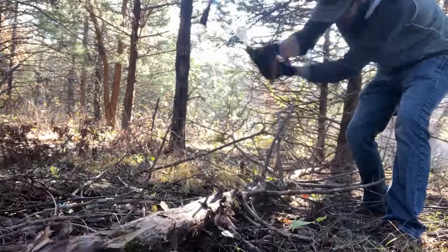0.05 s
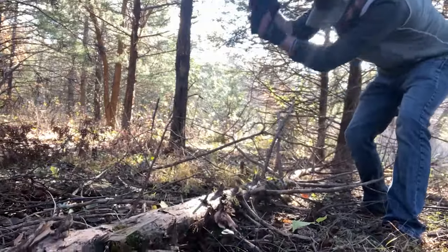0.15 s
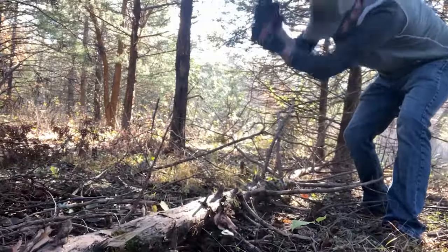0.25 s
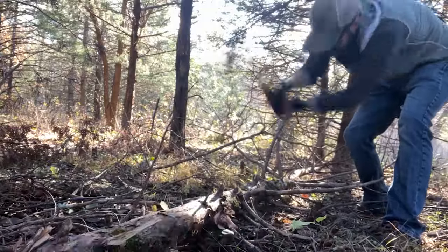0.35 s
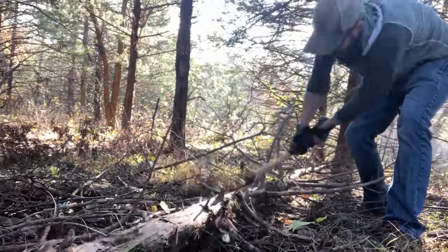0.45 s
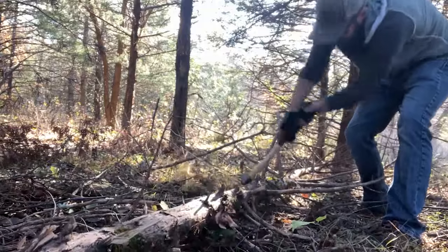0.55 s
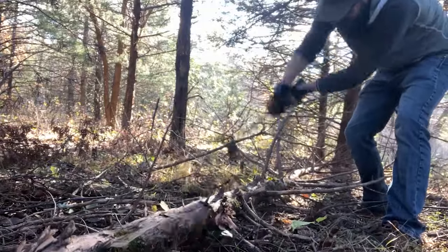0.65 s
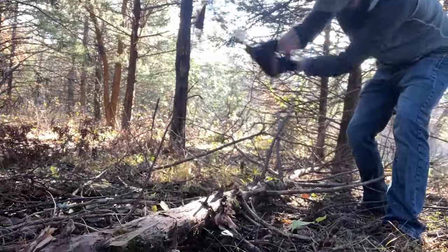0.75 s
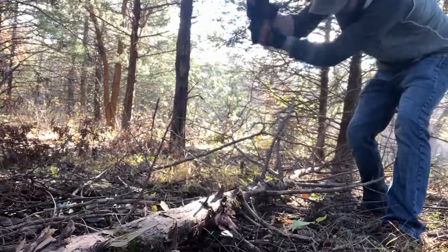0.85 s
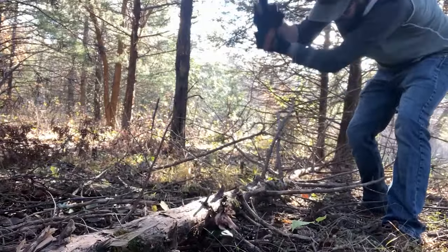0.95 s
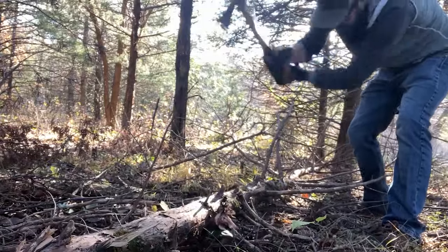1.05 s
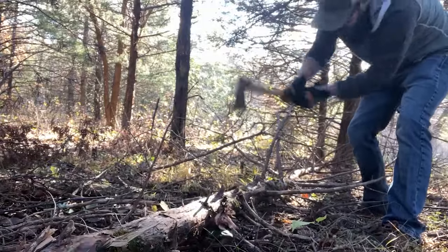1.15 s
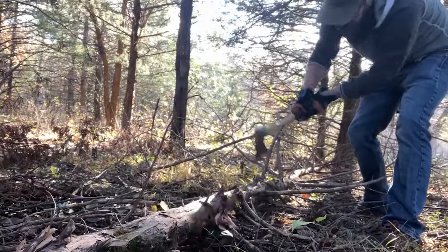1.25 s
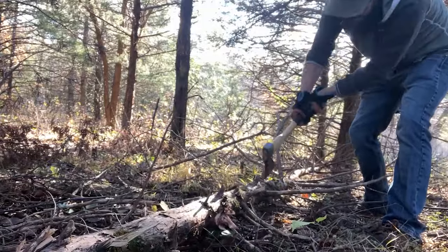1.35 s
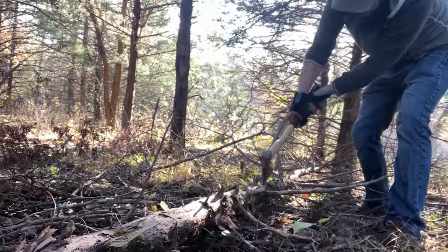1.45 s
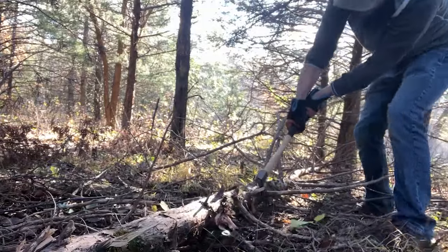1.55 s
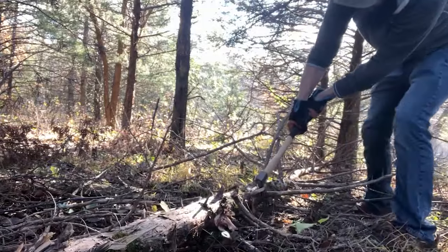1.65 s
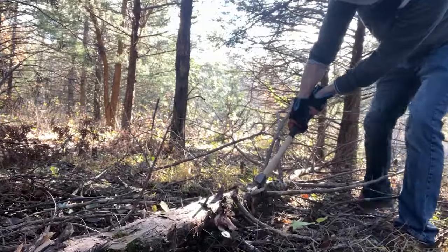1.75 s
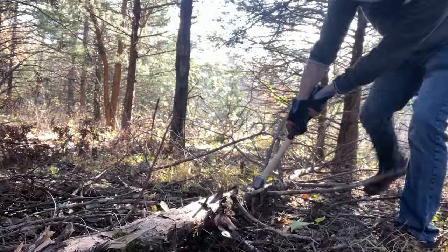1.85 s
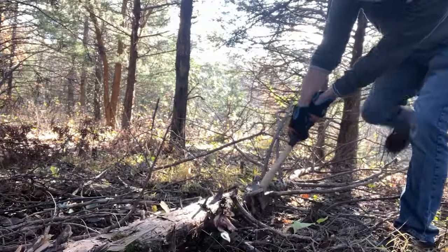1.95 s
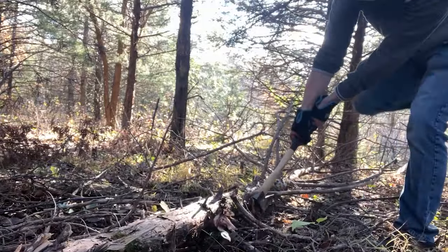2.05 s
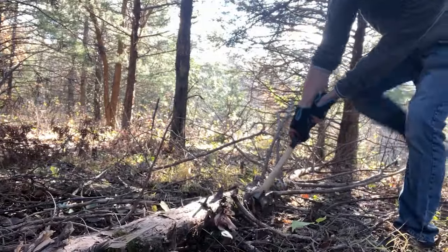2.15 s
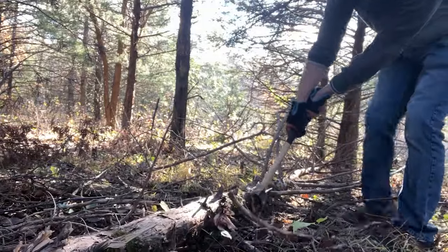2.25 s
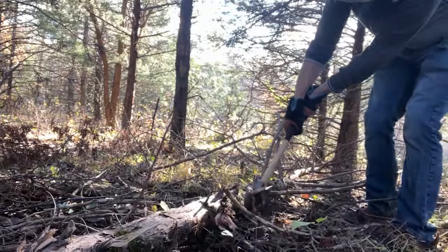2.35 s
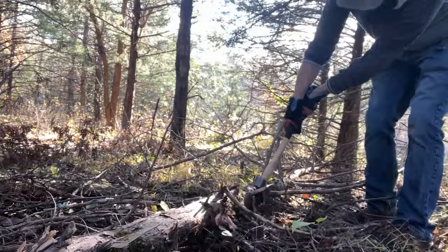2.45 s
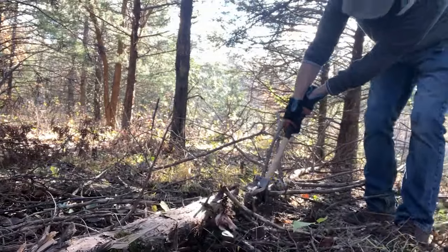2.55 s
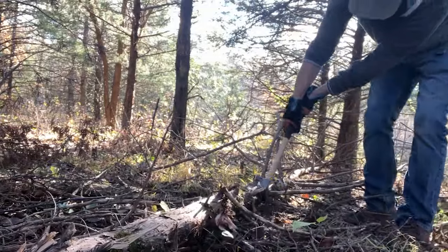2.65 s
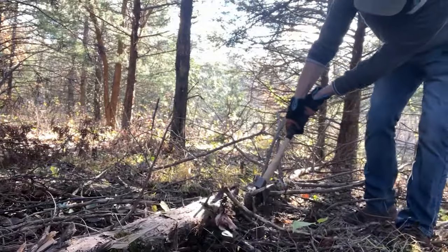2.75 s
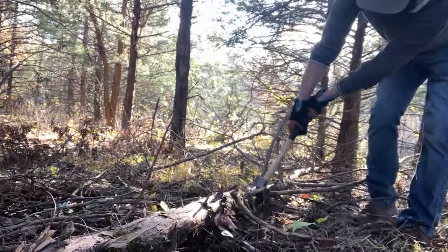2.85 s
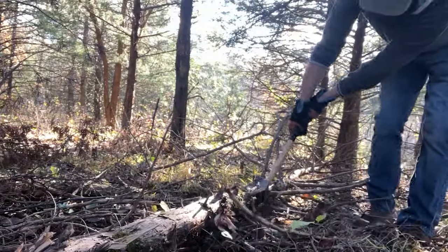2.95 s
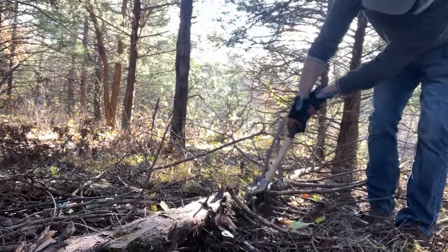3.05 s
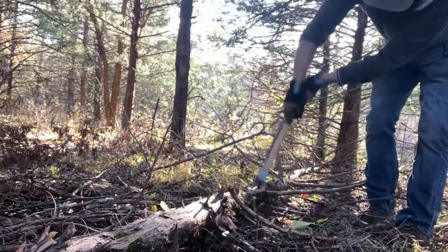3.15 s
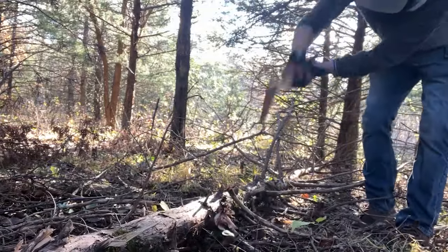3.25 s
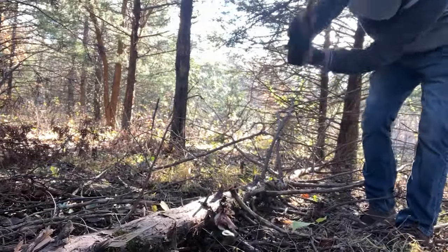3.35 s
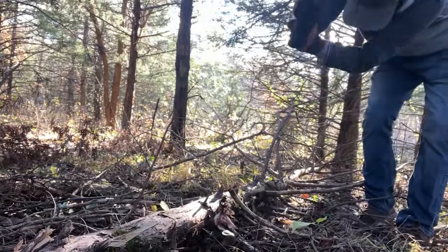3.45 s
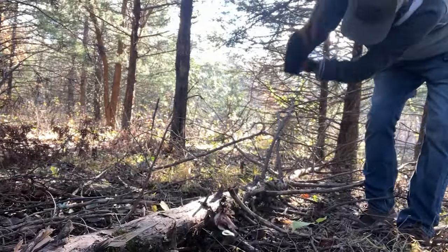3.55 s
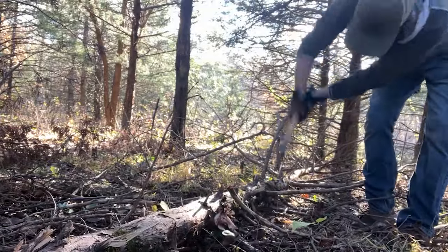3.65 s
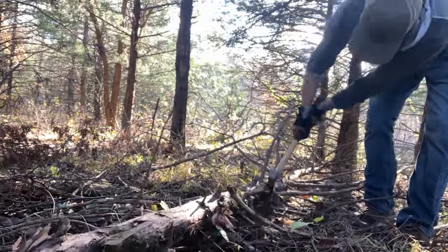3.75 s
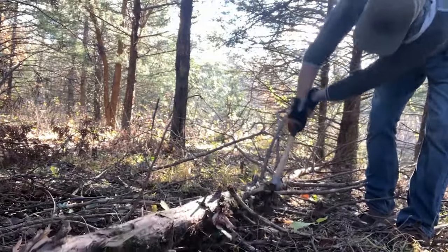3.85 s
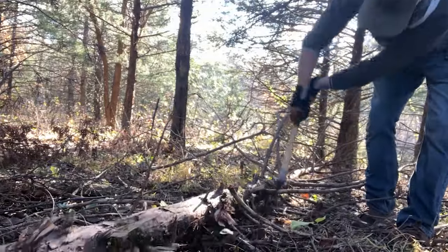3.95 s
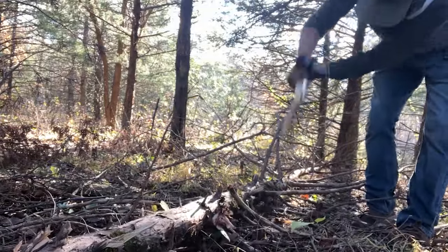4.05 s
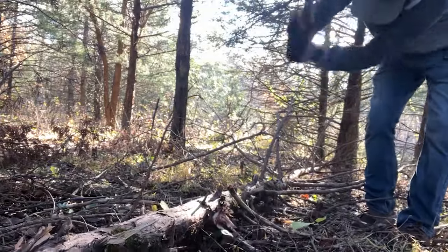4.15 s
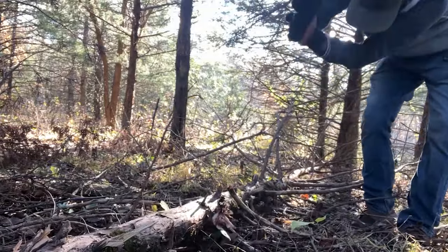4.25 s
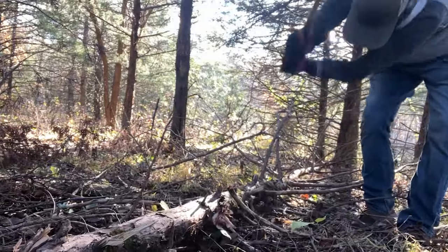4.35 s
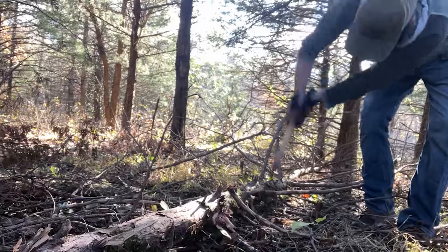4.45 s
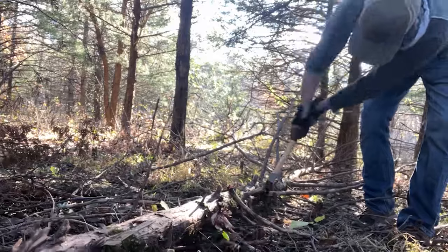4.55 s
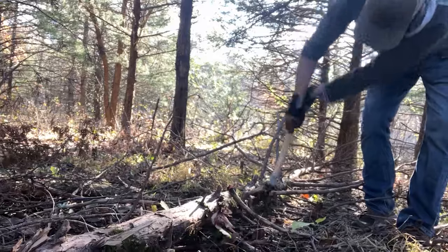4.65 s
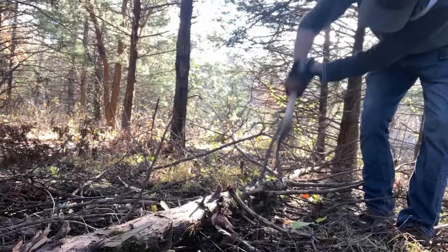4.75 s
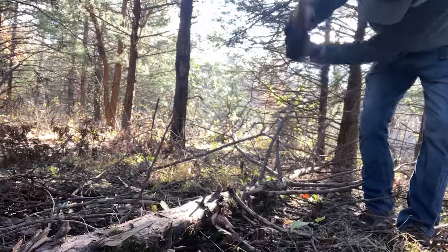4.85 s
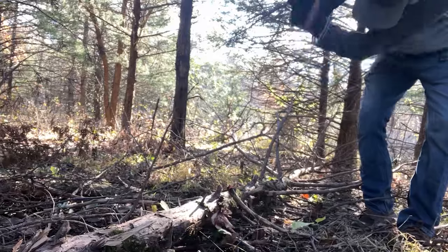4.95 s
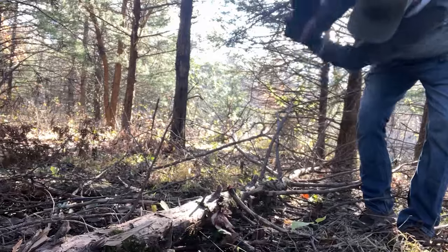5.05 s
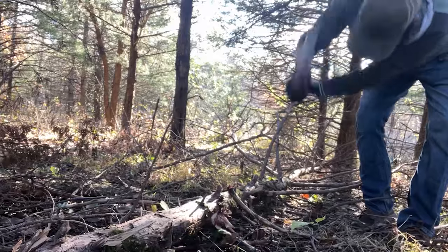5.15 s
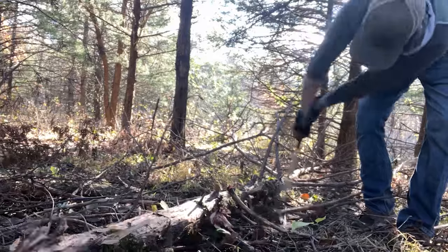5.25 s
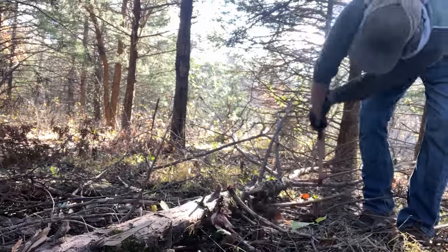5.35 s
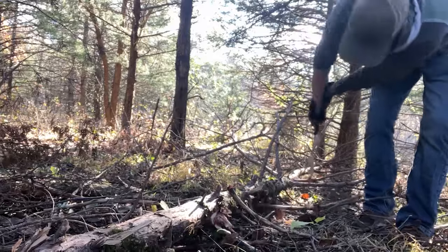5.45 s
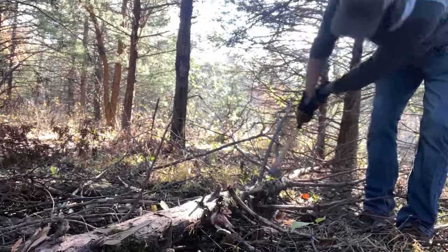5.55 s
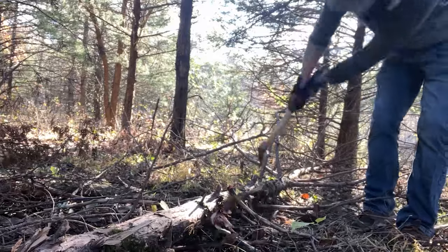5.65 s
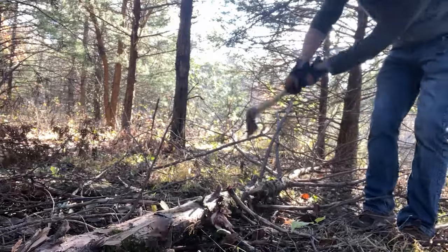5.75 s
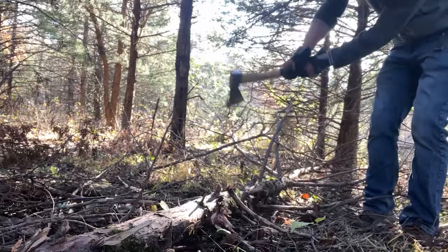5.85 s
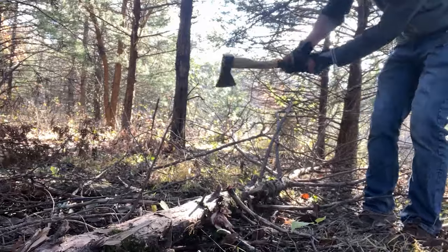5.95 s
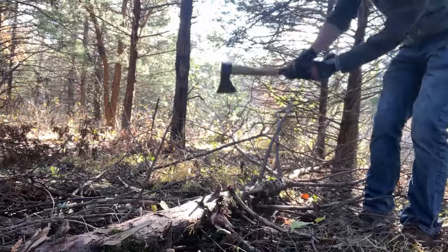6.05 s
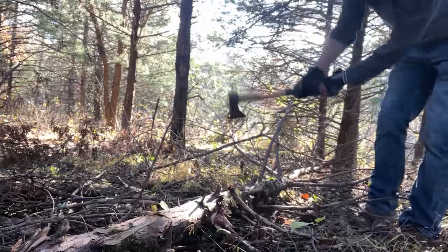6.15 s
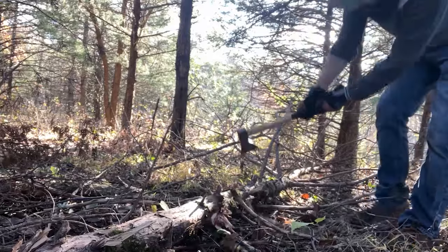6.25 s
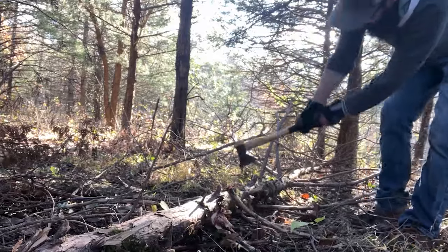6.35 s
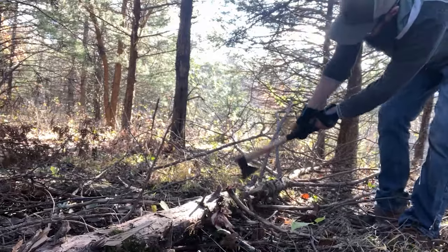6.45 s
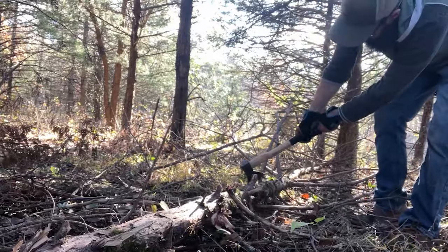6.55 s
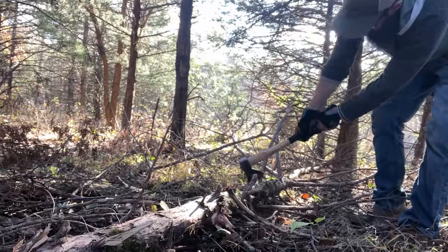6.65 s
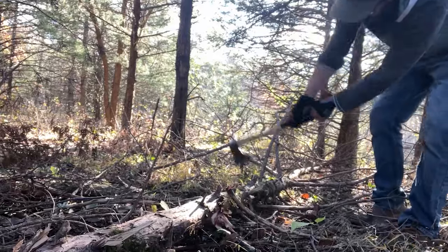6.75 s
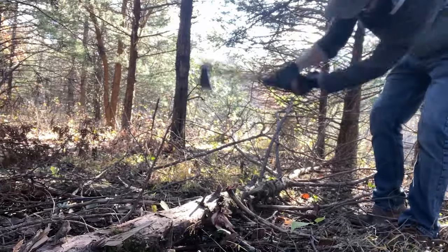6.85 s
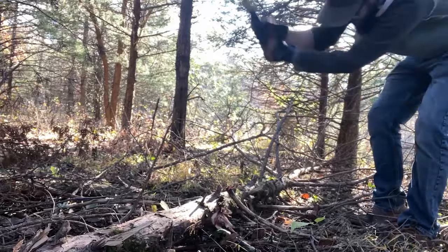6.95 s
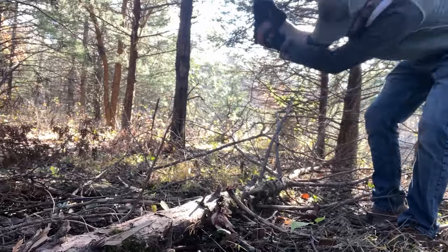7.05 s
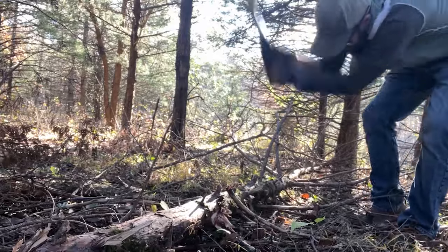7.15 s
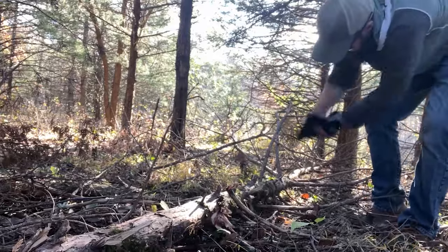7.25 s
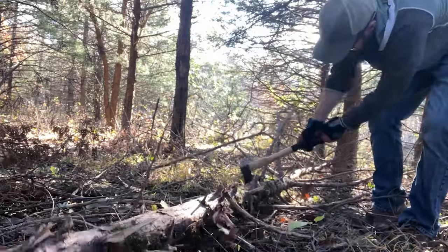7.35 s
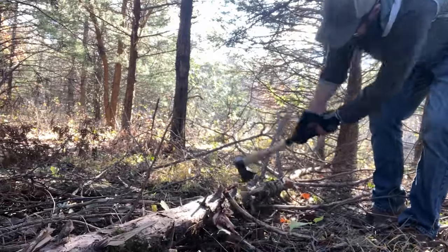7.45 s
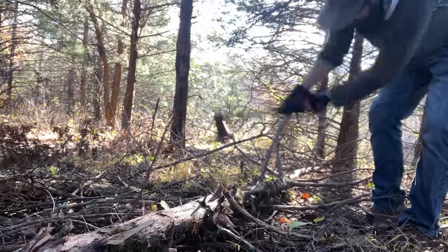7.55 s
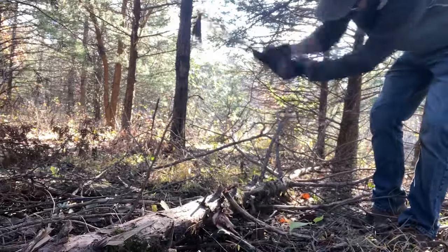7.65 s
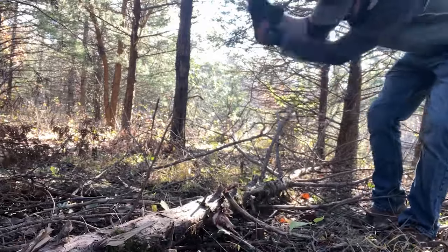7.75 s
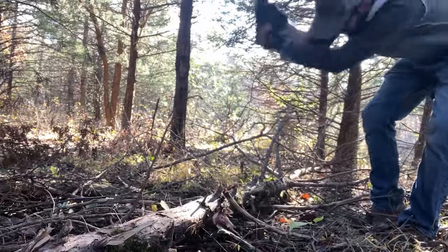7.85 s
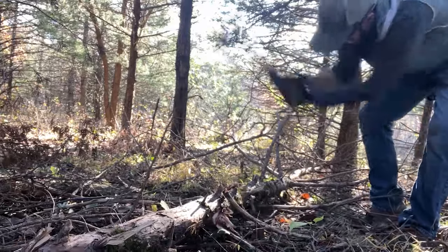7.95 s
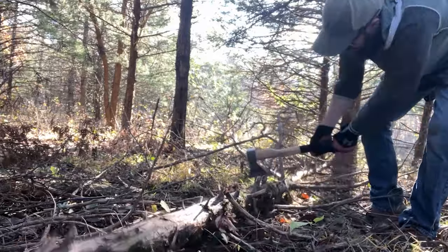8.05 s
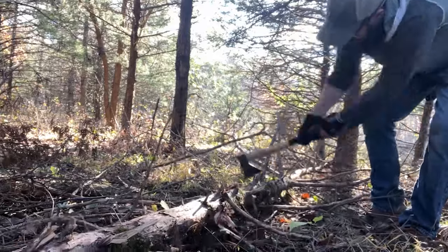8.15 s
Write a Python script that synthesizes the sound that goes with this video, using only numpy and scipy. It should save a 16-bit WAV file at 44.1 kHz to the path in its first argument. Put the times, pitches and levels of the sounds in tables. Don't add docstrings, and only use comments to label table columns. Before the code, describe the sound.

In a dry wood, heard in stereo from a few metres, light litter rustle and a quiet, far-off low rumble lead to a sharp axe blow at 0.4 s: a very short woody knock, bright tearing crack, quick limb slap and light falling debris. From 1.4 to 3.4 s boots and limbs shift: a bump near 1.6, a crisp twig snap near 1.8, then clustered snaps, bark scrapes, leaf crunches and rustling. Blows follow at 3.7, duller, then 4.5 and 5.25, higher and brighter. From 5.8 s leaves stir softly with small bumps and ticks. A faint, nasal, falling jay call comes at 6.0, 6.5, 7.0 and 7.5, off to one side and hazed by trees. The hardest blow lands at 7.3 with a bright snap and short spray of debris; the last, at 8.05, breaks into rapid slaps and splintering cracks.

```python
import sys
import numpy as np
from scipy import signal
from scipy.fft import rfft, irfft, next_fast_len
from scipy.io import wavfile
from scipy.ndimage import uniform_filter1d

SR = 44100
rng = np.random.default_rng(int(sys.argv[2]) if len(sys.argv) > 2 else 0)


def inscribe(sig):
    pcm = np.round(np.clip(np.atleast_2d(sig).T, -1, 1) * 32767)
    wavfile.write(sys.argv[1], SR, pcm.astype(np.int16))


def natural_amplitude(level_db):
    exponent = np.asarray(level_db, float) / 20
    return 10 ** exponent


N = 361619
HZ = np.fft.rfftfreq(next_fast_len(N), 1 / SR)


def along(table, hz):
    at, value = np.transpose(table)
    return np.interp(np.log(hz + 1), np.log(at + 1), value)


def colour(x, table):
    y = irfft(rfft(x, next_fast_len(N)) * natural_amplitude(along(table, HZ)))[..., :N]
    return y / np.sqrt(np.mean(y ** 2))


def walk(rate):
    hold = int(SR / rate)
    levels = np.repeat(rng.standard_normal(N // hold + 1), hold)
    return 1.5 * uniform_filter1d(uniform_filter1d(levels, hold), hold)[:N]


def add(out, sound, start_s):
    i = max(int(start_s * SR), 0)
    out[:, i:i + sound.shape[1]] += sound[:, :N - i]


def ring(t, hz, t60, rise, glide, turn):
    bend_s = glide * 0.0012 * np.exp(-np.maximum(t, -.002) / 0.000995)
    phase = 2 * np.pi * hz * (t - bend_s) + turn
    swell = 2 / (np.exp(np.clip(-t / rise, -50, 50)) + 10 ** np.clip(3 * t / t60, -50, 50))
    return swell * np.sin(phase)


# start_s [s], peak_db [dB], limb_hz [Hz], overtone_db [dB], overtone_hz [Hz]
AXE_BLOWS = [
    (0.439, -6, 444, -10, 1045),
    (3.713, -10.5, 491, 1, 950),
    (4.501, -6, 544, -9, 1120),
    (5.253, -5.5, 555, -5.5, 1103),
    (7.294, -4, 493, -11, 1243),
    (8.057, -8, 546, -10.5, 1290),
]
# start_s [s], peak_db [dB], limb_hz [Hz], overtone_db [dB]
SLAP_BACKS = [(0.455, -11.5, 485, -19.5), (0.448, -18.5, 470, -17.5), (0.4615, -17.5, 480, -19.5),
              (0.468, -28.5, 370, -15), (3.727, -23.5, 501, -6.5), (3.742, -25.5, 473, -2.5),
              (3.765, -31, 440, 3), (4.524, -21, 446, -9), (5.271, -26, 450, -25), (7.312, -21, 524, -21),
              (7.319, -19, 513, -17.5), (8.07, -12, 684, -30.5), (8.076, -10, 572, -4),
              (8.089, -16.5, 551, -27), (8.1, -14.5, 606, -15), (8.111, -22.5, 567, -25)]
# start_s [s], peak_db [dB], limb_hz [Hz], overtone_db [dB], ground_thud_db [dB]
BOOT_BUMPS = [(1.584, -17, 592, -20.5, -24), (1.59, -21, 443, -31, -10.5), (1.883, -27.5, 490, -20, -21),
              (2.012, -43, 620, -12, -20), (2.095, -52, 557, -5, -24), (2.222, -38, 552, -12, -15),
              (2.261, -20, 260, -20, -34), (2.267, -35, 291, -15, -4), (2.341, -34, 590, -6, -11),
              (2.763, -22, 403, -16.5, -20), (3.012, -40.5, 480, -0.5, -2), (3.116, -36, 430, -9, -3.5),
              (3.153, -46, 514, 10.5, 1), (3.373, -60, 326, 15, -6.5), (3.949, -37, 493, -20, -22),
              (4.229, -63, 476, 14.5, -3.5), (5.409, -26.5, 442, -22, -30), (5.576, -45, 343, -2.5, -16),
              (6.233, -32.5, 420, -15, -28), (6.27, -34.5, 337, -28, -14), (6.536, -22, 468, -40, -7),
              (7.784, -57.5, 577, 8, -26), (7.297, -28, 300, -3, 4), (8.058, -28, 295, -11, 11.5)]
BLOW_THUD_DB, SLAP_THUD_DB = -27.5, -16.5
OVERTONE_HZ, OVERTONE_SPREAD_HZ = 1000, 320


def knocks():
    out, t = np.zeros((3, N)), np.arange(-882, 4000) / SR
    struck = [row[:4] + (BLOW_THUD_DB, row[4]) for row in AXE_BLOWS]
    struck += [row + (SLAP_THUD_DB, None) for row in SLAP_BACKS]
    struck += [row + (None,) for row in BOOT_BUMPS]
    for (start_s, db, hz, over_db, thud_db, over_hz), c in zip(struck, rng.random((len(struck), 10))):
        turn = 2 * np.pi * c
        over_hz = over_hz or OVERTONE_HZ + OVERTONE_SPREAD_HZ * c[8]
        limb = ring(t - .0015, hz, .0115, .0007, .2, turn[0])
        limb += natural_amplitude(-19) * ring(t - .004, hz * (.65 + .25 * c[1]), .045, .002, .1, turn[2])
        limb += natural_amplitude(-20) * ring(t - .004, hz * (1.05 + .25 * c[3]), .035, .002, .1, turn[4])
        over = natural_amplitude(3) * ring(t - .0012, over_hz, .009, .0007, .12, turn[6])
        over += natural_amplitude(-1.5) * ring(t - .0015, 1600 + 400 * c[1], .008, 0.0004, 0.11, turn[1])
        over += natural_amplitude(-17) * ring(t + .002, 950 + 200 * c[3], .005, .004, .2, turn[5])
        thud = ring(t - .004, 170 + 90 * c[7], 0.017, 0.0026, 0.36, turn[7])
        thud += 0.98 * ring(t - .008, 55 + 50 * c[8], 0.035, 0.0018, 0.94, turn[9])
        parts = np.array([limb, natural_amplitude(over_db) * over, natural_amplitude(thud_db) * thud])
        add(out, natural_amplitude(db) * parts, start_s + 0.001092 + t[0])
    return out


def breaks(table, rise, t60, bend, crush_db):
    out, t = np.zeros((2, N)), np.arange(-768, 1280) / SR
    hz = np.fft.rfftfreq(len(t), 1 / SR)
    swell = 1 / (np.exp(np.minimum(-t / rise, 40)) + 10 ** np.minimum(3 * np.abs(t / t60) ** bend, 9))
    swell = swell * (1 + 1.5 * np.exp(-np.abs(t) / .0005))
    strain = natural_amplitude(crush_db) * np.exp(-np.abs(t) / .005) * np.exp(-(t / .012) ** 4)
    dull = np.exp(-np.log((hz + 1) / 2200) ** 2 / 0.56)
    for (start_s, db, centre_hz), burst in zip(table, rng.standard_normal((len(table), 2, len(t)))):
        peak = 0.54 + 0.89 * np.exp(-(np.log((hz + 1) / centre_hz) / 0.46) ** 2)
        crack = rfft(burst * swell) * peak * natural_amplitude(along(LEAF_TONE, hz))
        crunch = rfft(burst[::-1] * strain) * dull
        crack = irfft(crack + crunch, len(t))
        add(out, natural_amplitude(db) * crack / np.abs(crack).max(), start_s + .0012 + t[0])
    return out


# start_s [s], peak_db [dB], centre_hz [Hz]
TEARING_FIBRES = [(0.4402, -7.5, 8300), (0.4594, -28.5, 4900), (1.6572, -25.5, 10400), (2.2365, -16, 4800),
                  (2.2538, -17, 8900), (2.342, -26, 4440), (2.7628, -17.5, 9300), (3.37, -27, 4230),
                  (3.716, -7.5, 3960), (3.7374, -20.5, 4800), (3.7654, -21.5, 9150), (4.5035, -7.5, 9100),
                  (4.586, -31.5, 10100), (5.254, -9, 8120), (5.2877, -23.5, 4800), (5.5786, -30, 11100),
                  (6.231, -31.5, 6500), (7.293, -4, 8600), (7.3105, -10.5, 10200), (7.3698, -22.5, 5150),
                  (8.0577, -12.5, 9360), (8.0612, -30, 8450), (8.068, -11.5, 10700), (8.072, -8.5, 9720),
                  (8.0768, -6, 11030), (8.101, -15, 5000)]


def cracks():
    return breaks(TEARING_FIBRES, 0.00038, 0.018, 1.3, -6)


# start_s [s], peak_db [dB]
THIN_SNAPS = [(0.0987, -36.5), (0.619, -36), (0.729, -33), (0.8334, -33), (0.917, -36), (1.4007, -55),
              (1.443, -29), (1.488, -39), (1.7649, -13), (2.1683, -29), (2.3027, -36), (2.6462, -28),
              (2.7193, -20), (3.1172, -19), (3.2013, -32), (3.933, -28), (3.9978, -22.5), (4.127, -39),
              (4.1874, -48), (4.977, -44), (5.5358, -50), (5.7975, -29), (5.869, -31), (6.3007, -34),
              (6.35, -44), (6.4683, -35), (6.4888, -27.5), (6.5366, -24.5), (7.0736, -49), (7.1177, -47.5),
              (7.212, -42), (7.3246, -9.5), (7.5803, -30), (7.61, -28), (7.7871, -25), (7.8022, -26),
              (7.891, -40)]
# start_s [s], peak_db [dB]
THICK_SNAPS = [(0.2092, -33.5), (0.3354, -43), (1.914, -30), (2.0144, -28), (2.0657, -25), (2.088, -30),
               (2.1162, -27), (2.19, -26), (2.553, -19.5), (2.7058, -26), (2.814, -28.5), (3.0111, -37),
               (3.396, -31), (4.034, -34), (4.2334, -27.5), (4.299, -38.5), (5.472, -30), (6.384, -23),
               (6.602, -31)]
THIN_HZ, THICK_HZ = 10000, 4800


def snaps():
    rows = [(start_s, db, THIN_HZ) for start_s, db in THIN_SNAPS]
    rows += [(start_s, db, THICK_HZ) for start_s, db in THICK_SNAPS]
    uneven = np.exp(0.031 * rng.standard_normal(len(rows)))
    table = [(start_s, db, hz * u) for (start_s, db, hz), u in zip(rows, uneven)]
    return breaks(table, 0.0003, 0.008, 0.84, -38)


def rubs(table, width, rough_db):
    out, t = np.zeros((2, N)), np.arange(8192) / SR
    hz = np.fft.rfftfreq(len(t), 1 / SR)
    for (start_s, length_s, db, centre_hz), c in zip(table, rng.standard_normal((len(table), 3, len(t)))):
        grip = np.clip(t / .002, 0, 1) * np.exp(-(t / length_s) ** 2 * 1.5)
        jerks = natural_amplitude(rough_db * np.repeat(c[2, :128], 64))
        ringing = 1 / (1 + 1j * ((hz + 1) / centre_hz - centre_hz / (hz + 1)) / width)
        sound = irfft(rfft(c[:2] * grip * jerks) * ringing)
        add(out, natural_amplitude(db) * sound / np.sqrt(np.sum(sound[0] ** 2) / (length_s * SR)), start_s)
    return out


# start_s [s], length_s [s], level_db [dB], ring_hz [Hz]
BARK_SCRAPES = [(.42, .025, -34, 715), (1.54, 0.01, -48.5, 1000), (1.882, 0.027, -41.5, 563),
                (1.912, 0.03, -51.5, 1300), (1.915, 0.044, -49, 1970), (1.93, 0.035, -47.5, 595),
                (2.01, 0.016, -54, 1250), (2.01, .02, -48.5, 1840), (2.065, 0.07, -49, 1295),
                (2.08, 0.038, -42, 608), (2.22, .03, -43.5, 2030), (2.222, .04, -37.5, 589),
                (2.25, 0.024, -43.5, 1133), (2.325, 0.033, -38.5, 1760), (2.33, 0.051, -50, 1230),
                (2.33, 0.034, -40.5, 628), (2.415, 0.033, -50.5, 620), (2.692, 0.028, -48, 1210),
                (2.692, 0.025, -50, 1830), (2.76, 0.0055, -32, 944), (2.812, 0.01, -51.5, 1200),
                (3.008, 0.024, -50, 1210), (3.12, 0.0088, -44.5, 1580), (3.156, .014, -39, 1700)]


def scrapes():
    return rubs(BARK_SCRAPES, 0.056, 4.7)


# start_s [s], length_s [s], level_db [dB], centre_hz [Hz]
LEAF_CRUNCHES = [(1.483, 0.037, -44, 9050), (1.53, 0.016, -51, 9000), (1.663, 0.0169, -39, 5840),
                 (1.705, 0.025, -44, 6900), (1.85, 0.0074, -47.5, 7000), (1.93, 0.022, -42, 4860),
                 (1.975, 0.016, -49, 6960), (2.095, .015, -46.5, 9000), (2.227, 0.015, -40.5, 7070),
                 (2.26, 0.017, -34.5, 8070), (2.41, 0.013, -44.5, 6000), (2.785, 0.009, -42.5, 7000),
                 (2.842, .015, -41, 6000), (2.893, 0.017, -40, 5540), (2.945, 0.015, -48, 7100),
                 (5.254, 0.0023, -21, 1980), (8.058, 0.0096, -25.5, 1994), (8.077, .008, -24, 2100),
                 (6.84, 0.17, -62.5, 3150), (4.518, 0.017, -44.5, 9000), (5.271, .014, -35.5, 9250),
                 (5.296, 0.0037, -34.5, 10000), (7.33, 0.019, -37, 7820)]


def crunches():
    return rubs(LEAF_CRUNCHES, 0.69, 3.7)


def grains(rate, spread_db, smear_s, hiss):
    when = rng.random(N) < rate / SR
    size = np.minimum(rng.exponential(size=N), 3.6)
    fade = np.exp(-1 / (smear_s * SR))
    puffs = signal.lfilter([1], [1, -fade], when * natural_amplitude(spread_db * size))
    return (puffs / np.sqrt(np.mean(puffs ** 2)) + hiss) * rng.standard_normal((2, N))


def patchy(x, db, heft_db):
    low = signal.sosfiltfilt(signal.butter(2, 5500, fs=SR, output="sos"), x)
    turn = db * walk(13) + 0.37 * np.clip(heft_db, -15, 8)
    return low * natural_amplitude(turn) + (x - low) * natural_amplitude(-turn / 2)


def shaken(blows, delay_s, db, t60):
    late = np.roll(uniform_filter1d(blows ** 2, 300), int(delay_s * SR))
    return natural_amplitude(2 * db) * signal.lfilter([1 / 300], [1, -10 ** (-6 / (t60 * SR))], late)


TWIGS_DB, TWIGS_HEFT = -6.5, 0.73


def stirred(table, rise_s):
    power = 0
    for start_s, db, heft_db, t60 in table:
        t = np.arange(N) / SR - start_s
        swell_db = np.maximum(-60 * np.maximum(-t / rise_s, t / t60), -100)
        layer_db = db + np.array([[0], [TWIGS_DB + TWIGS_HEFT * heft_db], [heft_db]])
        power = power + natural_amplitude(2 * swell_db) * natural_amplitude(2 * layer_db)
    return power


# start_s [s], level_db [dB], heft_db (limbs over leaves) [dB], t60_s (time to fade by 60 dB) [s]
LITTER_STIRS = [(.01, -54.5, 1, 1.77), (1.44, -51, -4.5, 2.4), (1.53, -42.5, -6.5, 0.83),
                (1.69, -42.5, -7.5, 0.98), (1.92, -53, 4.5, 0.4), (1.99, -51.5, 8.5, 0.54),
                (2.1, -46, 6, 0.41), (2.25, -47, 13, 0.52), (2.34, -38.5, -2.5, 0.44),
                (2.52, -40, -8, 1.08), (2.61, -37.5, -17, 0.16), (2.74, -47.5, 4, 0.56),
                (2.89, -40.5, -5.5, 0.66), (2.99, -56.5, 4.5, 1.9), (3.13, -49.5, 2, 0.55),
                (3.37, -59.5, 2, 3.3), (3.94, -51, 5.5, 1.33), (4.29, -53.5, 0, 0.2), (4.9, -65, 3, 0.88),
                (5.58, -72, 5, 0.7), (5.83, -54, -12, 1.1), (5.92, -48, -9, 0.7), (6.07, -54.5, -8, 3.3),
                (6.26, -49, 0, 0.89), (6.5, -56, 2, 1.6), (6.56, -64, 15.5, 0.21), (7.15, -61.5, -4.5, 1.6),
                (7.46, -48, 5.5, 1.56), (7.64, -50, -16.5, 1.67), (7.93, -60, 4.5, 0.46)]
# level_db [dB], heft_db [dB], t60_s [s]
FALLING_DEBRIS = [
    (-48, 2.5, 1.69),
    (-50.5, 4, 0.9),
    (-51.5, 7, 1.26),
    (-48.5, 3, 1.29),
    (-38, 1.5, 0.37),
    (-36.5, 4.5, 0.54),
]
DEBRIS_DELAY_S, DEBRIS_RISE_S = .065, .12
SWISH_DB, SWISH_HEFT_DB, SWISH_RISE_S = -59.5, 17, 0.096


def movement():
    still_db, stir_rise_s = -104, 0.31
    debris = [(blow[0] + DEBRIS_DELAY_S, *row) for blow, row in zip(AXE_BLOWS, FALLING_DEBRIS)]
    swishes = [(blow[0], SWISH_DB, SWISH_HEFT_DB, .03) for blow in AXE_BLOWS]
    moved = stirred(LITTER_STIRS, stir_rise_s) + natural_amplitude(2 * still_db)
    return moved + stirred(debris, DEBRIS_RISE_S) + stirred(swishes, SWISH_RISE_S)


# pitch_hz [Hz], level_db [dB]
LEAF_TONE = [(1500, -6.5), (3000, 0.5), (5000, 2), (6500, -0.6), (10000, -3.5), (13000, -5.5), (15800, -5),
             (17000, -50.5)]
# pitch_hz [Hz], level_db [dB]
TWIG_TONE = [(550, -20), (800, -5.5), (1300, -9.5), (2200, -9.5), (3500, -32), (5000, -27)]
# pitch_hz [Hz], level_db [dB]
LIMB_TONE = [(120, -9.5), (250, -8), (500, -2), (700, 1), (950, -10), (1400, -22)]
# level_db [dB], t60_s [s]
BLOW_SHAKE = [
    (-12.5, 0.19),
    (-15, 0.09),
    (-17.5, 0.17),
]


def rustle(blows):
    moved = movement()
    stir = walk(45)
    heft_db = 10 * np.log10(moved[2] / moved[0])
    leaves = patchy(colour(grains(450, 4.6, .0025, 1.15), LEAF_TONE), 1.8, heft_db)
    leaves = leaves * natural_amplitude(1.1 * stir + 1.2 * walk(20))
    twigs = colour(grains(150, 4.2, .004, .7), TWIG_TONE) * natural_amplitude(1.6 * stir + 1.5 * walk(14))
    limbs = colour(grains(80, 2.9, 0.0071, 0.92), LIMB_TONE) * natural_amplitude(0.79 * stir)
    out = 0
    for layer, power, blow, shake in zip([leaves, twigs, limbs], moved, blows, BLOW_SHAKE):
        out = out + layer * np.sqrt(power + shaken(blow, 0.014, *shake))
    return out


def echoes(x, t60):
    t = np.arange(SR // 2) / SR
    reply = rng.standard_normal((2, len(t))) * natural_amplitude(-60 * t / t60) / np.sqrt(t60 * SR / 14)
    return signal.fftconvolve(x, reply, axes=1)[:, :N]


# start_s [s], length_s [s], top_hz [Hz], sag_hz_per_s [Hz/s], level_db [dB]
JAY_CALLS = [
    (6.015, .315, 908, 350, -54),
    (6.505, .3, 876, 330, -57.5),
    (6.995, .3, 865, 310, -57),
    (7.54, .26, 850, 230, -60),
]
# harmonic [multiple of the pitch], level_db [dB]
JAY_HARMONICS = [(2, -13), (3, -6), (4, 0), (7, -17), (8, -7.5), (10, -21)]
JAY_RISE_S, JAY_FALL_S, JAY_FADE_DB = .022, .03, -5
JAY_SCOOP_HZ, JAY_SCOOP_S = 60, .022


def jay():
    out, t = np.zeros((2, N)), np.arange(N) / SR
    waver = 1 + .008 * walk(170)
    hoarse = natural_amplitude(3.5 * walk(150) + .6 * walk(30))
    turns = 2 * np.pi * rng.random((len(JAY_CALLS), 2, 1))
    for (start_s, length_s, top_hz, sag, top_db), turn in zip(JAY_CALLS, turns):
        at_s = start_s + np.array([0, JAY_RISE_S, length_s - JAY_FALL_S, length_s])
        db = top_db + np.array([-11, 0, JAY_FADE_DB, -11])
        on = (t > at_s[0]) & (t < at_s[-1])
        since = t[on] - start_s
        hz = top_hz - sag * since - JAY_SCOOP_HZ * np.exp(-since / JAY_SCOOP_S)
        phase = 2 * np.pi * np.cumsum(hz * waver[on]) / SR
        voice = 0
        for k, harmonic_db in JAY_HARMONICS:
            rough = np.roll(hoarse, 900 * k)[on]
            voice = voice + natural_amplitude(harmonic_db) * rough * np.sin(k * (phase + turn))
        out[:, on] += voice * natural_amplitude(np.interp(t[on], at_s, db) + 4.0)
    bird = out * np.array([[.5], [1.45]])
    return bird + natural_amplitude(-9) * echoes(bird, .9)


# pitch_hz [Hz], level_db [dB per Hz]
FAR_TONE = [(15, -40.5), (25, -16), (38, -6), (70, 0.5), (142, -7.5), (192, -12), (273, -18), (358, -18.5),
            (399, -25.5), (1600, -32), (7920, -34.5), (15200, -71), (16500, -64.5)]
# start_s [s], level_db [dB]
RUMBLE_SWELL = [
    (0.0, -54),
    (1.26, -55.5),
    (2.24, -50.5),
    (3.15, -50.5),
    (3.79, -56),
    (4.5, -49.5),
    (5.0, -56.5),
    (6.21, -51.5),
    (8.06, -53.5),
    (8.2, -46),
]


def far_rumble():
    rumble = colour(rng.standard_normal((2, N)), FAR_TONE)
    swell_db = np.interp(np.arange(N) / SR, *np.transpose(RUMBLE_SWELL))
    return rumble * natural_amplitude(-1.5 + swell_db + 0.78 * walk(3.9))


def scene():
    limb, over, thud = knocks()
    tearing = cracks()
    wood = limb + over + thud
    hits = tearing + snaps() + np.array([wood, np.roll(wood, 17)])
    background = far_rumble() + jay()
    litter = rustle([tearing[0], over, limb]) + scrapes() + crunches()
    return hits + litter + background


# pitch_hz [Hz], likeness [0-1]
BEAM_LIKENESS = [(150, .9965), (300, .991), (520, .97), (750, .84), (1000, .85), (1500, .6), (2100, .3),
                 (4000, .25), (6000, .55), (7500, .88), (9000, .99), (10500, .99), (12000, .85),
                 (13300, .9998)]
# pitch_hz [Hz], lead [radians]
BEAM_LEAD = [(520, 0.), (780, 3.1), (1290, 6.), (2150, 9.3), (5000, 9.5), (7900, 11.2), (9100, 12.5),
             (10400, 12.6), (12800, 14.4), (13600, 15.7), (14800, 15.7), (15500, 16.02), (16500, 15.7)]
# pitch_hz [Hz], level_db [dB]
BEAM_TILT = [(600, 0.), (1000, -1.5), (2500, -3.), (4000, -3.5), (5500, -5.), (7500, -2.), (9000, 0.)]


def low_pass(x):
    return signal.sosfilt(signal.butter(12, 16960, fs=SR, output="sos"), x)


def record(dry):
    dry = np.tanh(1.522 * dry) / 1.002
    quarter_turn = np.imag(signal.hilbert(dry[0], next_fast_len(N)))[:N]
    turned = quarter_turn * np.tanh(39.0 * walk(16))
    same, other = rfft([dry[0], .75 * turned + .66 * dry[1]], next_fast_len(N))
    like = np.clip(along(BEAM_LIKENESS, HZ), 0, 1)
    same = same * np.sqrt((1 + like) / 2)
    other = other * np.sqrt((1 - like) / 2)
    turn = np.exp(.5j * along(BEAM_LEAD, HZ)) * natural_amplitude(along(BEAM_TILT, HZ) / 2)
    beams = irfft(np.array([(same + other) * turn, (same - other) / turn]))[:, :N]
    knee = np.clip(beams, -.7, .7)
    beams = knee + .27 * np.tanh((beams - knee) / .27)
    bass_cut = signal.butter(2, 30, "high", fs=SR, output="sos")
    mix = signal.sosfilt(bass_cut, beams)
    return low_pass(mix)


dry = scene()
out = record(dry)
inscribe(out)
```